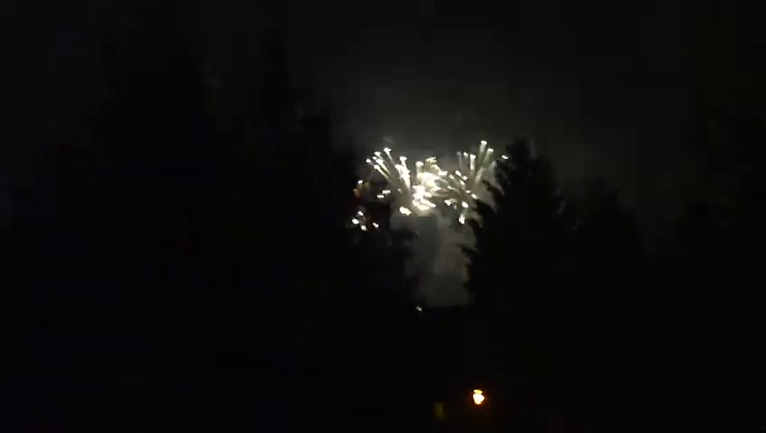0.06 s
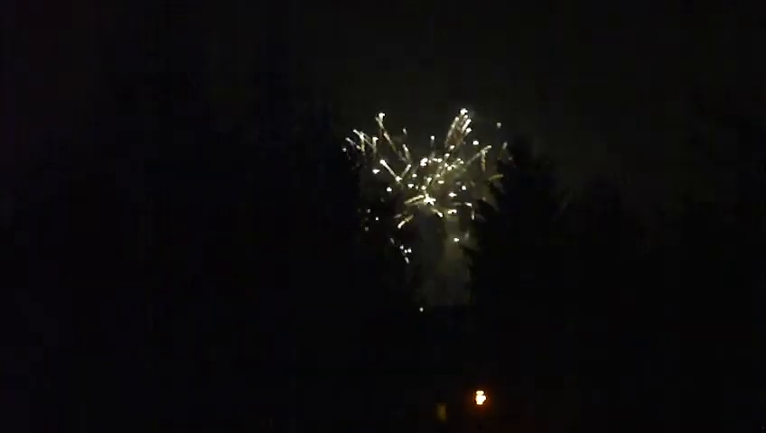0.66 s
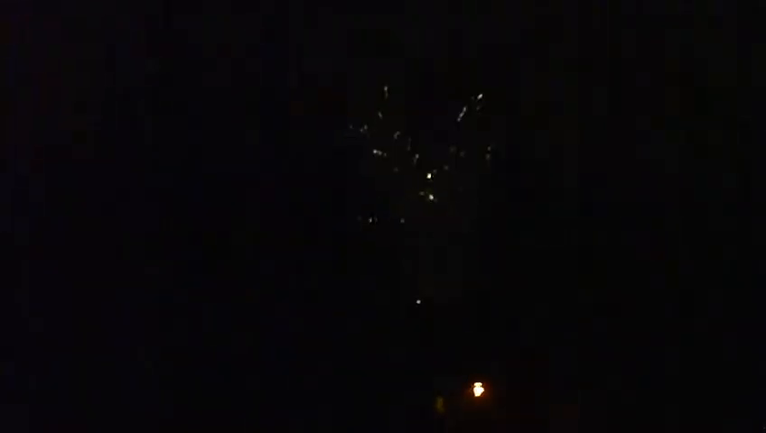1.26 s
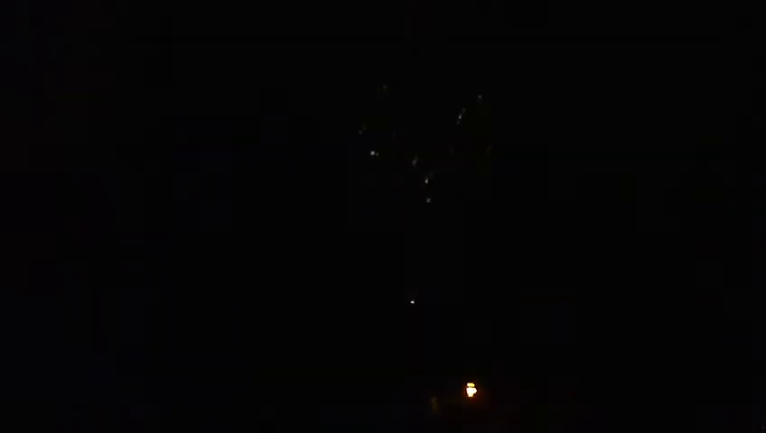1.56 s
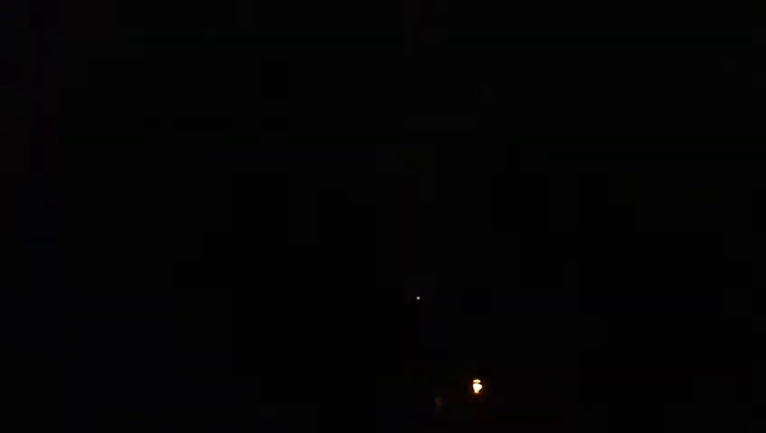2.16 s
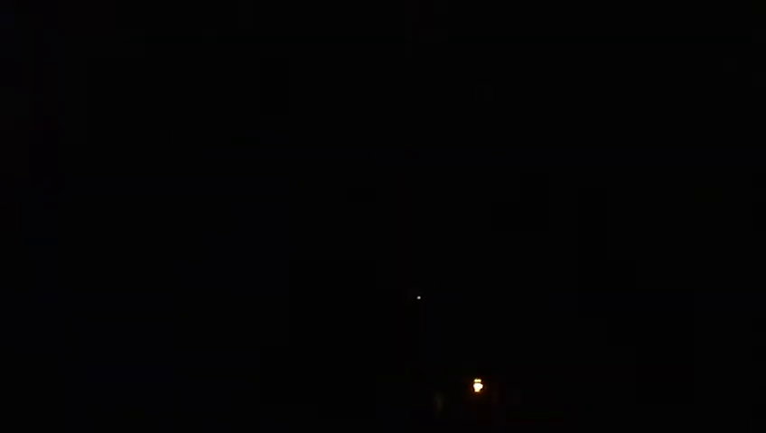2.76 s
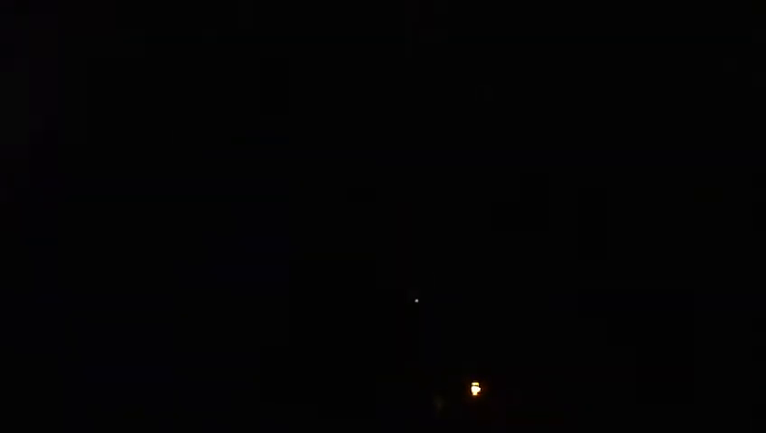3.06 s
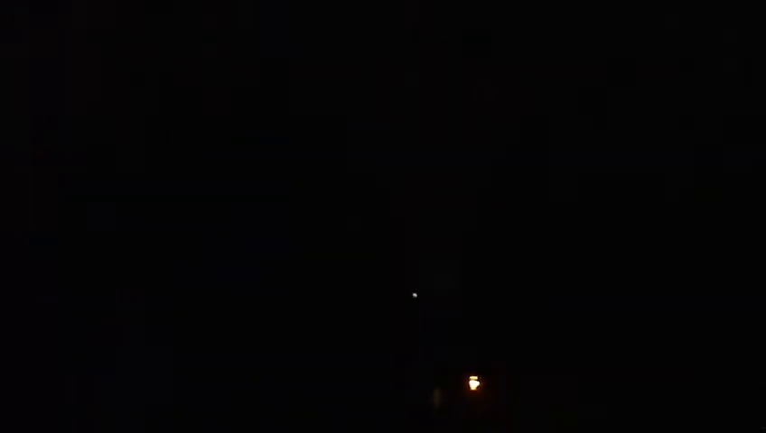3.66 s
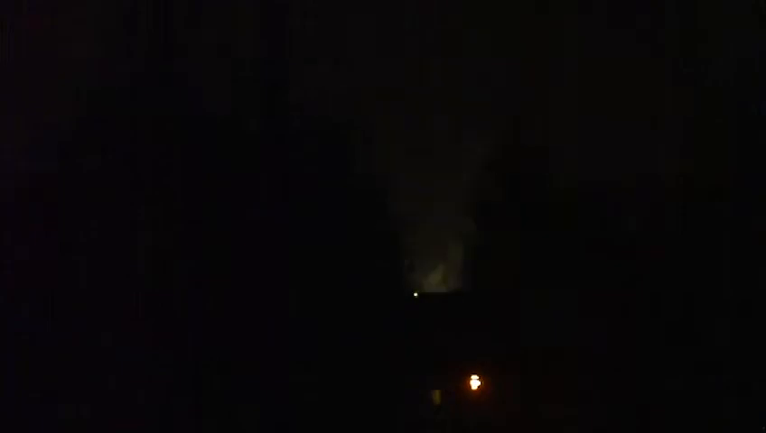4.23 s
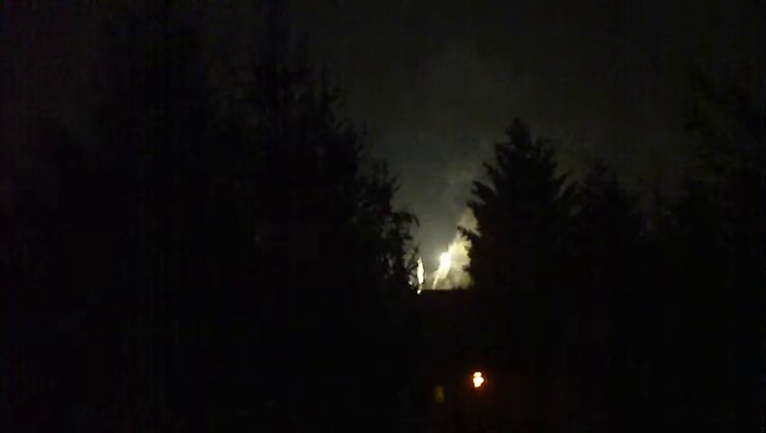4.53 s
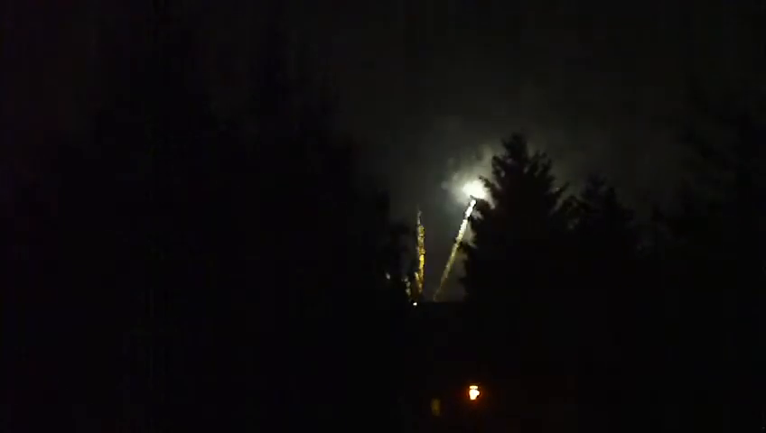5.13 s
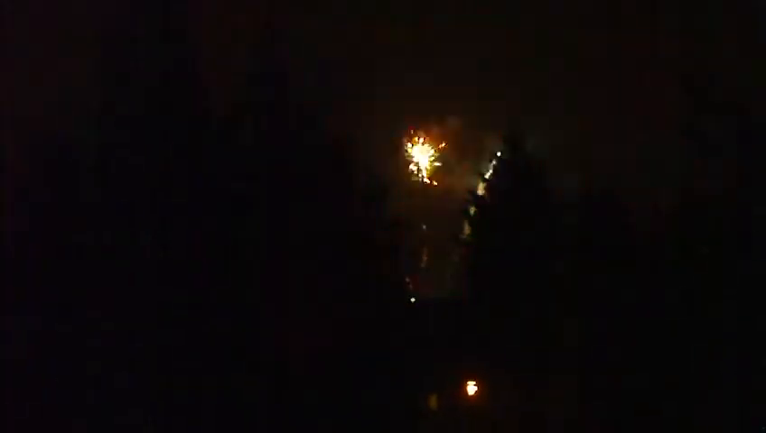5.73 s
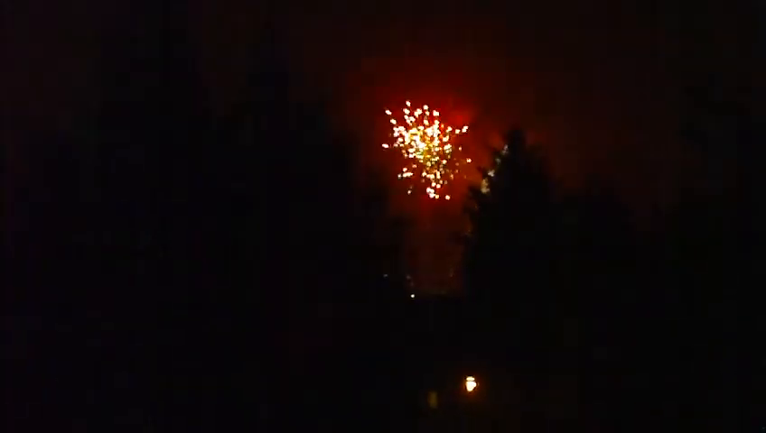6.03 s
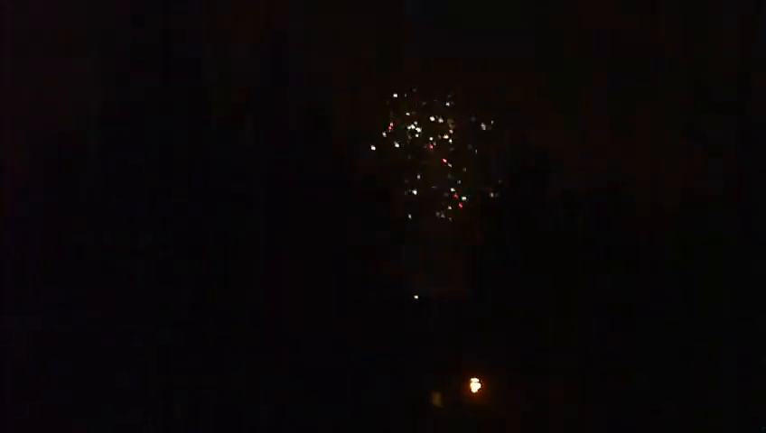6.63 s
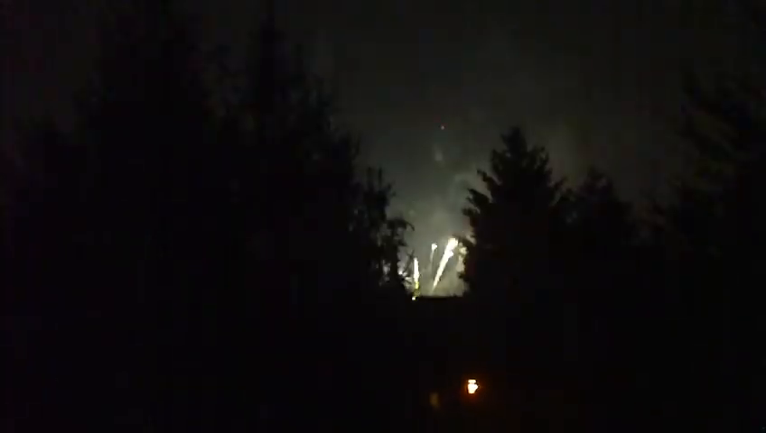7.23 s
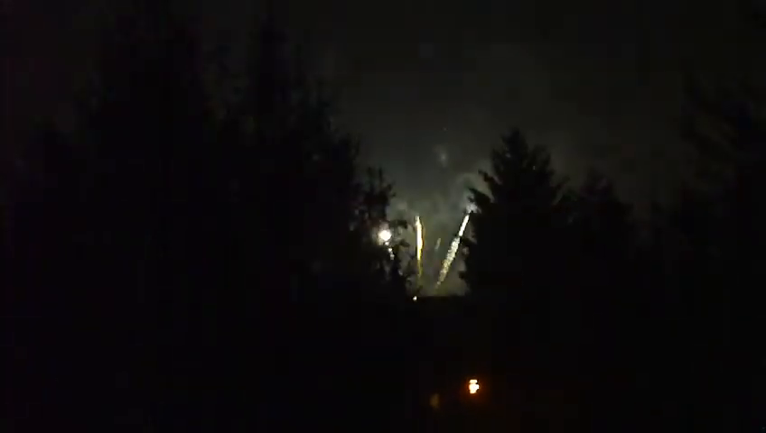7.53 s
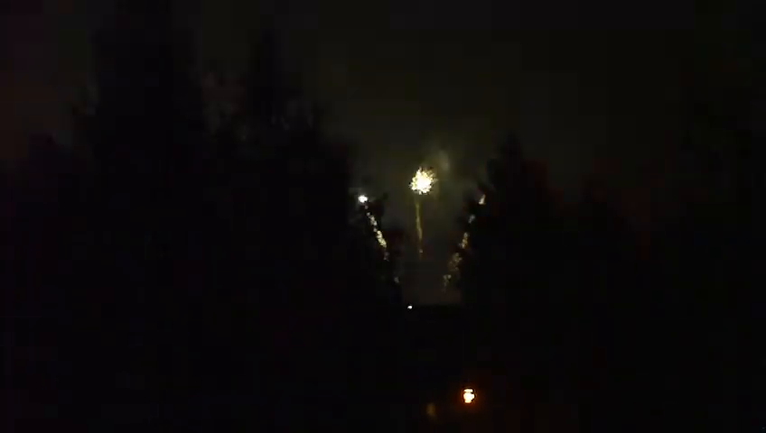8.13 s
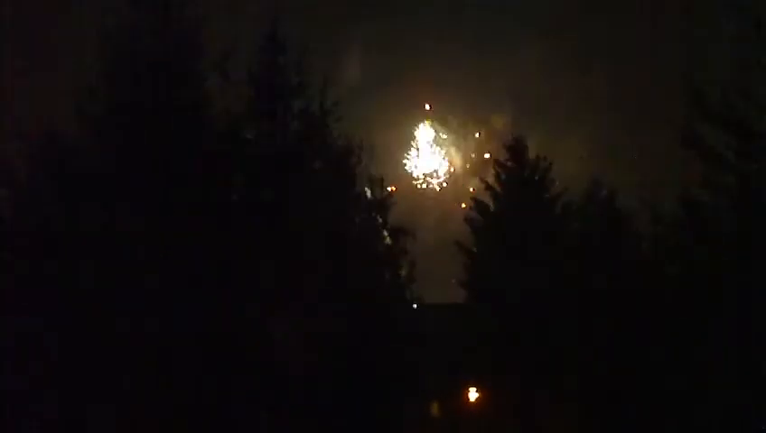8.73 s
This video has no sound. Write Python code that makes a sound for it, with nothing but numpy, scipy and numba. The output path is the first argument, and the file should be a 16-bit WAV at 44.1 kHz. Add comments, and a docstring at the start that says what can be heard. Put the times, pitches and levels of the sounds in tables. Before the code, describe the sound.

Fireworks go off in a dense, unbroken barrage outdoors among trees. Sharp bangs come many times a second, each with a short echo, over clouds of crackling stars and a dull roar of distant bursts. A few faint, high whistles fall in pitch during the first second. Past the middle a close firecracker snaps and launch tubes pop. The small microphone thuds and briefly ducks on the loudest bangs.

```python
"""Night fireworks among trees

Shells crack, each with a hard reflection and a tail scattered by the woods; launch tubes ring, close
stars snap and a firecracker goes off twice. Further salvos and clouds of crackling stars swell out of a
steady roar, and a few burning tubes whistle, falling in pitch. A small camera hears it all: on a loud
bang its microphone overloads with a low thud, the first cycles clip and gain control ducks the roar."""
import sys
import numpy as np
from scipy import signal
from scipy.fft import rfft, irfft
from scipy.io import wavfile
from scipy.ndimage import uniform_filter1d, minimum_filter1d
from numba import njit

SR = 44100
rng = np.random.default_rng(int(sys.argv[2]) if len(sys.argv) > 2 else 0)


def to_wav(s):
    """Save 16-bit WAV."""
    ch = np.atleast_2d(s).T  # columns
    pcm = np.round(np.clip(ch, -1, 1) * 32767)  # PCM
    wavfile.write(sys.argv[1], SR, pcm.astype(np.int16))


N = 396459

# far salvos that swell out of the roar: (peak time [s], half-length [s], level [dB])
FAR_SALVOS = [(.38, 0.066, -19), (.82, 0.065, -19.5), (.98, 0.059, -19.5), (1.36, 0.071, -19.5),
              (1.63, 0.12, -23.5), (1.91, 0.036, -14.5), (2.25, 0.03, -42), (2.56, 0.11, -22.5),
              (3.92, 0.049, -23.5), (4.2, 0.42, -29.5), (4.66, 0.086, -17.5), (5.32, 0.039, -23),
              (5.52, 0.052, -21.5), (5.85, 0.17, -24.5), (6.42, 0.042, -38), (6.62, 0.076, -22.5),
              (7.02, 0.064, -19), (7.24, 0.036, -17), (7.5, 0.13, -22.5), (7.97, 0.24, -25),
              (8.33, 0.043, -19), (8.6, 0.062, -19.5), (8.97, 0.03, -16)]
# clouds of crackling stars: (peak time [s], half-length [s], level [dB], sizzle [dB])
STAR_CLOUDS = [(0.456, 0.071, -30.5, 0), (0.783, 0.12, -35.5, 6), (1.035, 0.033, -29, 2),
               (1.31, 0.091, -25, -5.5), (1.616, 0.069, -27, 0), (1.734, 0.016, -22, -4),
               (1.844, 0.099, -23, -0.5), (2.068, 0.083, -27, -5.5), (2.253, 0.066, -32.5, -3),
               (2.618, 0.12, -30.5, -6), (3.144, 0.15, -32.5, -6), (4.04, 0.11, -37, -1),
               (4.352, 0.11, -34.5, -17), (4.537, 0.025, -25.5, -21), (4.739, 0.047, -25.5, -4.5),
               (5.383, 0.053, -44, -11), (5.644, 0.31, -31, -6), (5.947, 0.041, -28, -24),
               (6.088, 0.037, -28, -3.5), (6.183, 0.1, -37.5, 0), (6.4, 0.33, -38, -12),
               (7.096, 0.12, -31.5, -2), (7.322, 0.09, -31.5, -30), (7.998, 0.1, -29.5, -1.5),
               (8.315, 0.11, -31.5, -19), (8.52, 0.015, -23.5, -16), (9, 0.059, -29, -14)]
# tone colour of the crackle: (frequency [Hz], level [dB])
CRACKLE_SPECTRUM = [(30, -68), (150, -18), (400, 6), (800, 11.5), (1300, 9.5), (1900, 8.5), (2300, 2.5),
                    (3300, 0), (3900, -9), (5000, -17.5), (6300, -25), (7200, -51)]
ROAR_BED_DB, CRACKLE_BED_DB = -27.5, -43.5  # between the swells, before each layer's trim
BLAST_GAIN = np.sqrt(.003 * SR)  # gives a unit-energy pulse an rms of 1 over 3 ms


def shells(trunks_db=-12, trunks_dull_db=-7, woods_db=-17):
    """Each shell is a short blast and its hard reflection, scattered by branches, trunks and woods."""
    # the nearer bursts: (time [s], level [dB], body pitch [Hz], bark [dB], crack [dB],
    # microphone overload thud [dB], branch scatter [dB], reflection lag [ms], reflection [dB])
    bursts = [(0.0663, -9, 652, -9.5, -15.5, -5, 12, 6.1, -4),
              (0.123, 3.5, 656, -6.5, -7, -10, 7, 15.6, -4), (0.208, -8.5, 585, -2.5, -27, 8, 2, 9, 3),
              (0.3076, -11, 725, -4, -17, -3, -6, 8.5, -18), (0.3262, -4, 625, 0.5, 0, 14, 10, 7.8, 4.5),
              (0.3857, -3, 780, 11, 10.5, 6.5, -13, 16.8, -2), (0.5838, -3.5, 490, 4, 10, 22, 6.5, 8.9, 2),
              (0.727, -9, 695, 2, -17, -29, 3, 7.9, 5.5), (0.8385, -13, 770, 8, -18, 6, 7.5, 7.5, 7),
              (0.8649, -2, 537, 1, 5, 11, 2, 8.0, 0), (0.9355, -15.5, 650, -2, -11, -10, -2, 8.5, -8),
              (0.9691, -4, 580, 4.5, -3.5, 1, -7.5, 16, -6.5),
              (0.9837, -2.5, 620, -3.5, -9, -3, -1, 18, 0.5), (1.0152, -3, 570, -1.5, -0.5, 15, 2, 8, -3.5),
              (1.031, -3.5, 540, 7, -3, 8, -10, 7.3, 3), (1.0519, -1.5, 553, 10, 3.5, 2, -14, 7.8, -6),
              (1.2124, -13.5, 694, -2, -14, -15.5, 1, 6.1, -9),
              (1.2619, -6, 660, 0.5, -20, -19, 3, 19.6, -5), (1.3568, -10, 610, 5, -13, -3.5, -1, 8.5, 7),
              (1.3815, -7, 650, -12, -13, -13, -8, 8.5, -5), (1.3987, 0.5, 735, -18, -24, 7, -10, 7.1, -8),
              (1.4133, -1, 614, 5.5, 9.5, 25, 0, 12.4, -5), (1.4299, -3.5, 497, -3, 2, -3, 0, 8, -2),
              (1.5706, -11.5, 700, 1, -18, -8, 2, 8.5, -7), (1.6168, -13, 765, -0.5, 1, -20.5, 8, 3.3, 1),
              (1.6252, 0.5, 780, -6, -4, -24, -10, 7.8, -20),
              (1.6572, -5, 800, -2.5, -19, -15, -1, 7.9, 4.5), (1.7681, -8, 566, -2, -11, -7.5, 6, 9.5, -1),
              (1.8169, -7.5, 810, 13, -14, -14, 1, 9.6, -23), (1.8713, -14, 650, 4, 11, -16, 12.5, 9.3, 10),
              (2.064, -14, 616, -2, -16, -15, 3, 15, 2), (2.208, -19, 700, 5, -13, -9.5, 9, 8.1, 3),
              (2.2324, -11, 816, 4, -26, -8, 6, 9.3, -7.5), (2.2726, -17, 533, 5.5, -15, 5, 5, 8.1, -2),
              (2.4248, 2, 710, -4, -12, -10, 5.5, 16.2, -0.5), (2.5505, -11, 800, 3, -7, -2, 5, 5.9, -4),
              (2.5816, -10.5, 950, 10.5, 5, 0, 4, 7.3, -7), (2.6356, 3, 713, -4, -7.5, 6, 1.5, 8.9, -3.5),
              (2.758, -7.5, 603, -7, -8, -31, 7, 8.7, 2), (2.7927, -13, 765, -0.5, -20, -9, 1, 8.2, 6),
              (2.9199, -2.5, 570, -3, -0.5, -12, 8, 10.6, -2.5),
              (2.9714, -4, 604, -10, -11.5, -6, -1, 8.0, -9),
              (3.193, -6.5, 560, 4, -12.5, -5, 2.5, 9.2, -0.5),
              (3.2727, -16.5, 830, 0, -14, 10, 11, 14.4, 10), (3.4118, -13.5, 724, -4, -4, -4, 8, 8.5, -14),
              (3.5046, -13.5, 730, -5, -15.5, 1, -3, 6.7, 0.5), (3.574, 3, 614, 0.5, -7.5, 9, 3, 18, -7),
              (3.6403, -2, 605, -0.5, -12.5, 5, 0, 7.3, -3), (3.7099, -8.5, 580, 2, -3.5, 6, 0, 5.9, 2),
              (3.7545, -13, 650, 4.5, -31, -7, 4.5, 8.9, 6.5),
              (3.852, -6, 825, -5.5, -8.5, -10, 9, 7.8, 4.5),
              (3.911, 1, 593, -4.5, -1.5, -9, 2, 14.4, -8.0), (4.3173, -5, 614, 1, -2.5, -13, -1.5, 9, 6),
              (4.3955, -10, 740, 1.5, -13, -8, 8, 12, -0.5), (4.437, 0.5, 825, 4, -4.5, 1, 0, 9.8, 3.5),
              (4.5083, -13.5, 760, 6.5, -10, 18, 5, 9.8, 6), (4.545, -15.5, 700, 9, -14, -10, 4, 7.1, -4),
              (4.5766, -3, 775, 4.5, 3, -14, 10.5, 8.7, 1), (4.6193, -5, 600, 7, -15, -3, -10, 9.8, -7),
              (4.7192, -6.5, 820, 12, 0.5, -18, 4.5, 17.3, -5.5),
              (4.978, -8.5, 650, -1.5, -9, -20, 10.5, 5.5, 2.5),
              (4.994, 2, 680, -1, -6.5, 0, -3, 16.7, -11), (5.0292, 1.5, 580, -1, -11, -16, -9, 16, -20),
              (5.2898, -11, 644, -1.5, -18, -3, 8, 4.7, -5), (5.3239, -9, 660, -2, -17, -14, 12, 21, -1),
              (5.3742, -10, 860, 2, -15, -17, 3, 12, 0), (5.401, -9.5, 710, 13, -27, -7, 0, 17.6, -5),
              (5.7713, 0, 663, 8, -0.5, -3, -3, 17, -2), (5.834, -3, 640, -4.5, -15, -11, 5, 7.8, 3.5),
              (5.888, -0.5, 1080, 4, -12, 7, -9, 7, -13), (6.0398, -8, 660, -7, -30, 2, 6, 16, -7),
              (6.069, -14.5, 720, -10, -7, 13, 5, 8.7, 4), (6.2037, -16.5, 840, -7, -36, -15, 4, 8.6, -0.5),
              (6.2905, -16.5, 620, 12, -23, 4, 2, 11, 5), (6.4233, -11.5, 790, -12, -31, -26, -8, 17, -19),
              (6.535, -4, 684, 2.5, -7.5, -2, 1, 16.5, 4),
              (6.6603, -4.5, 790, -3.5, -14, -17.5, -2, 6.8, -14),
              (6.7118, -1, 470, 0, 2.5, 11, 3.5, 8, -0.5), (6.774, -3, 477, -4, -7, 13, 0, 8.4, -12),
              (6.811, -7, 460, 0, -8, 5, -7, 7.8, -5), (6.871, -15, 460, -12, -2, 9, -1, 9.3, -17.5),
              (6.9826, -5, 636, -5.5, -0.5, 12, 11.5, 7.7, 2.5),
              (7.0419, -17, 640, -6, -17.5, -7, -11.5, 8.5, -2),
              (7.1119, -14.5, 616, 3, -6.5, -2, 5.5, 8.3, -4.5),
              (7.1321, -9, 594, -2.5, -17, -35, 9, 10.7, 3.5),
              (7.1549, -2.5, 573, -1.5, -15, -26, -5, 8.6, -5),
              (7.216, -15, 553, 3.5, -16, -7, 4, 13.6, -10), (7.3956, -9, 675, 0, -9.5, -18.5, 6, 8.3, 5),
              (7.4777, -9, 696, 0, -18, -12, -3, 8.5, -4), (7.499, -2, 706, -4.5, -7, -23, 11, 7.7, 2.5),
              (7.526, -0.5, 666, 4.5, -5, -2.5, -9, 7.8, -0.5),
              (7.6316, -13, 615, 5.5, -7, 16, 6.5, 8.3, 7),
              (7.6494, -9.5, 704, 6.5, -9.5, -6, -0.5, 8.4, 2), (7.7803, 1, 695, -2.5, -5, -28, 1, 15, -1),
              (7.8286, -1, 546, -1.5, 0.5, 20, -2, 9.6, -8.5),
              (7.9188, -9, 650, -2, -14, -16.5, -2, 8.5, -7),
              (7.9954, -10.5, 760, 7, -8, -18, 5.5, 7.4, -1),
              (8.0535, -18.5, 750, 16, -16, -8, 1.5, 8.5, -4),
              (8.1008, 0, 540, -4.5, -16, -36, -2, 8.7, -1),
              (8.2284, -15, 730, 2.5, -25, -4, 10.5, 6.6, -4.5),
              (8.2802, -2, 870, 12.5, -5, -10, 1, 17.3, -1),
              (8.3993, -12, 553, -1.5, -17, -15, 16, 11.3, 4),
              (8.4925, -12.5, 810, 14, -9, -11, 2, 17.4, -5), (8.519, -5, 634, 5, -11, -28, 4.5, 8, 7),
              (8.602, -6.5, 710, 12.5, 7, 18, 5.5, 18, -1.5),
              (8.7807, -15, 734, -8, -10, -7, -6, 7.2, -13.5),
              (8.8357, -9.5, 576, 4.5, 5, -4, 4.5, 17.8, -3.5),
              (8.941, -3.5, 637, 6.5, -4, 12, -7, 14.6, 0)]
    out = np.zeros(N)
    for s, db, body_hz, bark_db, crack_db, mic_thud_db, branch_db, lag_ms, echo_db in bursts:
        gain = undb(db) * BLAST_GAIN
        direct = gain * blast(body_hz, bark_db, crack_db, mic_thud_db)
        add(out, s, direct)
        reflection = gain * blast(body_hz, bark_db, crack_db - 3, mic_thud_db - 4)  # duller and thinner
        add(out, s + lag_ms / 1000, undb(echo_db) * reflection)
        # branches scatter the upper mids; the top of the crack stays dry
        upper_mids = filtered(direct, [900, 2800], "band")
        add(out, s, undb(branch_db) * signal.fftconvolve(upper_mids, scatter(.078, .00049)))
        off_trunks = gain * blast(body_hz, trunks_dull_db, 2 * trunks_dull_db, mic_thud_db)
        add(out, s, undb(trunks_db) * signal.fftconvolve(off_trunks, scatter(.35, .004)))
    # the long way through the woods takes the treble out
    return out + undb(woods_db) * through(filtered(out, 1300), scatter(t60=.84, build_s=.012))


def blast(body_hz, bark_db, crack_db, mic_thud_db):
    """A dry report (body, upper-mid bark, treble crack) with the low thud of the mic overloading."""
    # tone colour of a shell's blast: (frequency [Hz], level [dB])
    blast_spectrum = [(30, -47), (100, -43), (170, -26.5), (260, -10), (380, -2.5), (500, 4.5), (620, 7.5),
                      (760, 2), (1200, -10), (1850, -8.5), (2400, -18), (3300, -17.5), (4600, -25.5),
                      (6200, -32.5), (7400, -59.5)]
    hz, db = np.transpose(blast_spectrum)
    db = db + np.interp(hz, [100, 260, 750, 1200, 2000, 3000],
                        [mic_thud_db, 0, 0, bark_db, bark_db, crack_db])
    hz = hz * (body_hz / 650) ** np.clip(2 - hz / 1000, 0, 1)  # retune the body, leave the treble
    report = pulse(np.column_stack([hz, db]), ripple_db=2.5)
    for ring_hz, width_hz in (body_hz, 1400), (2800, 1300), (4300, 900):
        report = ring(report, ring_hz, width_hz)
    return report


def close_stars(lag_s=.016, echo_db=-9):
    """A near star splits with a thin, dry snap; a weaker reflection follows."""
    # single stars close by: (time [s], level [dB], bark pitch [Hz], treble [dB])
    splits = [(0.0653, -27, 2580, 15), (1.591, -18, 1600, -5), (1.744, -23, 1700, -9),
              (1.9068, -25, 1700, -9), (2.0793, -16, 1710, -15), (2.212, -24, 2300, -11),
              (2.268, -23, 2410, 1), (2.413, -18.5, 2280, 1), (2.5387, -20, 2900, 1),
              (3.192, -22.5, 2520, -1), (4.52, -24, 2500, -10), (5.3223, -20, 2200, -12),
              (5.7097, -32, 1700, -15), (5.778, -8, 2400, -10), (5.9378, -23, 1600, -14),
              (5.985, -25, 2000, -12), (6.077, -14.5, 2400, 2), (6.9556, -18, 1800, -9),
              (7.1017, -17, 2900, -11), (7.4696, -20, 1520, -25), (7.913, -24, 1700, -12),
              (8.3306, -14, 1700, -22), (8.506, -27, 2700, 1)]
    out = np.zeros(N)
    for s, db, bark_hz, treble_db in splits:
        spectrum = [(150, -45), (700, -14), (bark_hz, 0),
                    (4000, treble_db - 11), (6200, treble_db - 22), (7400, -48)]
        snap = ring(pulse(spectrum, ripple_db=4), bark_hz, width_hz=1600)
        snap = snap + .5 * through(snap, scatter(t60=.027, build_s=.0005))
        snap = undb(db) * BLAST_GAIN * snap / np.linalg.norm(snap)
        add(out, s, snap)
        add(out, s + lag_s, undb(echo_db) * snap)
    return out


def firecracker():
    """A close firecracker: a thin, dry report under a few milliseconds of tearing treble."""
    # two quick reports: (time [s], level [dB], tear decay [s], body pitch [Hz], body [dB])
    reports = [(5.4546, 4, .017, 1200, -9), (5.4627, 1, .006, 950, 0)]
    out = np.zeros(N)
    for s, db, t60, body_hz, body_db in reports:
        gain = undb(db) * BLAST_GAIN
        tear = filtered(scatter(t60, build_s=.0009), [1100, 2800], "band")
        add(out, s, gain * tear / np.linalg.norm(tear))
        add(out, s, gain * undb(body_db) * blast(body_hz, bark_db=7, crack_db=0, mic_thud_db=-15))
    return out


def mortars(t60=.15, rise_s=.003):
    """The air column of a launch tube rings briefly after the lifting charge."""
    # tubes firing: (time [s], pitch [Hz], level [dB])
    launches = [(3.405, 218, -25), (4.589, 237, -11.5), (6.714, 383, -15), (6.776, 380, -14),
                (6.815, 394, -21), (6.869, 370, -21)]
    out, t = np.zeros(N), np.arange(SR // 2) / SR
    for s, hz, db in launches:
        add(out, s, undb(db) * np.sin(2 * np.pi * hz * t) * rise_and_decay(t, rise_s, t60))
    return out


def whistles(waver=.0078, sputter_db=1.5, rasp_db=-3, smear_db=-9):
    """Burning tubes swell and fade, falling in pitch; uneven burning roughens them, echoes smear them."""
    # falling whistles: (peak time [s], half-length [s], pitch at peak [Hz], fall [Hz/s], level [dB])
    glides = [(0.068, 0.038, 4920, 920, -27), (0.146, 0.1, 5150, 397, -40),
              (0.304, 0.032, 4580, 299, -28.5), (0.443, 0.076, 4710, 1290, -32.5),
              (0.56, 0.025, 4080, 2370, -24.5), (0.72, 0.046, 4210, 1110, -34),
              (0.81, 0.047, 3950, 2350, -33.5), (.94, .03, 3920, 500, -41)]
    out, size = np.zeros(N), int(1.4 * SR)
    for peak_s, half_s, peak_hz, fall_hz_per_s, db in glides:
        t = np.arange(size) / SR - peak_s
        hz = (peak_hz - fall_hz_per_s * t) * (1 + waver * wander(200, size))
        phase = 2 * np.pi * np.cumsum(hz) / SR
        rasp = wander(500, size) * np.cos(phase) + wander(500, size) * np.sin(phase)
        envelope = undb(db + sputter_db * wander(60, size)) * np.exp(-.5 * (t / half_s) ** 2)
        tone = envelope * (np.sin(phase) + undb(rasp_db) * rasp)
        add(out, 0, tone + undb(smear_db) * through(tone, scatter(t60=.14, build_s=.005)))
    return out


def far_reports(db=-32, lag_s=.0074, salvo_share=.33):
    """Smaller bursts further off: dull double knocks that stand out of the roar and grow with a salvo."""
    knocks = through(pops(60, spread_db=1.3), blast(750, bark_db=0, crack_db=-10, mic_thud_db=-14))
    swell_db = salvo_share * (swells(FAR_SALVOS, ROAR_BED_DB) - ROAR_BED_DB)
    return undb(db + swell_db) * unit(knocks + np.roll(knocks, int(lag_s * SR)))


def star_snaps(trim_db=-1, lag_s=.007, echo_db=-5):
    """Crackling stars near enough to be heard one by one: each a gritty pop with its reflection."""
    power = tails(pops(45, spread_db=1.8) ** 2, fade_s=.0054)
    power = power + undb(echo_db) ** 2 * np.roll(power, int(lag_s * SR))
    grit = through(rng.standard_normal(N), pulse(CRACKLE_SPECTRUM))
    return undb(swells(STAR_CLOUDS, CRACKLE_BED_DB) + trim_db) * unit(np.sqrt(power) * grit)


def sizzle(trim_db=-8):
    """The nearer clouds keep their top: a fine spitting above the crackle."""
    # tone colour of the spitting: (frequency [Hz], level [dB])
    sizzle_spectrum = [(1200, -33.5), (2600, -11.5), (3400, 4.5), (4600, -0.5), (6400, -16.5),
                       (7200, -35.5)]
    cloud_tops = [(s, half_s, db + sizzle_db) for s, half_s, db, sizzle_db in STAR_CLOUDS]
    spitting = unit(through(pops(4000, spread_db=2), pulse(sizzle_spectrum)))
    return undb(swells(cloud_tops, bed_db=-60) + trim_db) * spitting


def far_crackle(trim_db=7.5, flurries_per_s=55):
    """Clusters of burning stars go off at once over a steady fine crackle, partly blurred by distance."""
    sparks = pops(1300, spread_db=2.8)
    starts = rng.random(N) < flurries_per_s / SR
    flurries = np.sqrt(tails(starts, fade_s=.005) + .11)
    crackle = through(sparks * flurries, pulse(CRACKLE_SPECTRUM))
    crackle = unit(crackle + .5 * through(crackle, scatter(t60=.042, build_s=.0032)))
    return crackle * undb(swells(STAR_CLOUDS, CRACKLE_BED_DB) + trim_db)


def far_roar(trim_db=3.5, blur_db=-3, flutter_db=1.48):
    """Dull far bursts, partly blurred by distance, merge into a roar that swells with each salvo."""
    # tone colour of the far bursts: (frequency [Hz], level [dB])
    roar_spectrum = [(25, -75), (70, -52.5), (150, -25.5), (230, -16), (340, -8), (540, 1), (720, 0),
                     (930, 1.5), (1200, -6), (1900, -11), (2400, -18.5), (4000, -37), (7000, -82)]
    roar = through(pops(900, spread_db=2.8), pulse(roar_spectrum))
    roar = unit(roar + undb(blur_db) * through(roar, scatter(t60=.46, build_s=.00056)))
    return roar * undb(swells(FAR_SALVOS, ROAR_BED_DB) + trim_db + flutter_db * wander(30))


def swells(table, bed_db):
    """Level in dB of a steady bed plus bell-shaped swells, whose powers add."""
    t = np.arange(N) / SR
    power = sum(undb(db) ** 2 * np.exp(-((t - s) / half_s) ** 2) for s, half_s, db, *_ in table)
    return 10 * np.log10(power + undb(bed_db) ** 2)


def pops(per_s, spread_db):
    """Randomly timed spikes: mostly small, a few large."""
    fires = rng.random(N) < per_s / SR
    spikes = fires * undb(spread_db * np.minimum(rng.exponential(size=N), 5))
    return unit(spikes - spikes.mean())


def pulse(spectrum, ripple_db=0, size=2048):
    """A causal pressure pulse of unit energy; the ripple is the colour of its own path."""
    bins_hz = np.maximum(np.arange(size // 2 + 1) * SR / size, 1)
    hz, db = np.transpose(spectrum)
    ripple = np.interp(bins_hz, np.geomspace(100, 8000, 32), rng.standard_normal(32))
    db = np.interp(np.log(bins_hz), np.log(hz), db) + ripple_db * ripple
    # minimum phase packs the energy into the attack
    cepstrum = irfft(db * np.log(10) / 20)
    cepstrum[1:size // 2] *= 2
    cepstrum[size // 2 + 1:] = 0
    pressure = irfft(np.exp(rfft(cepstrum)))
    return pressure / np.linalg.norm(pressure)


def ring(x, hz, width_hz):
    """All-pass resonance: holds back one band, so that a spike becomes a few cycles."""
    radius = np.exp(-np.pi * width_hz / SR)
    poles = [1, -2 * radius * np.cos(2 * np.pi * hz / SR), radius * radius]
    return signal.lfilter(poles[::-1], poles, x)


def scatter(t60, build_s):
    """Countless small echoes of unit total energy that build up and die away."""
    t = np.arange(int(t60 * SR)) / SR
    echoes = rng.standard_normal(len(t)) * rise_and_decay(t, build_s, t60)
    return echoes / np.linalg.norm(echoes)


def rise_and_decay(t, rise_s, t60):
    """An envelope with a soft attack and a decay of 60 dB in t60 seconds."""
    return np.exp(-np.log(1000) * t / t60) * (1 - np.exp(-t / rise_s))


def tails(spikes, fade_s):
    """Gives each spike an exponential tail."""
    return signal.lfilter([1], [1, -np.exp(-1 / (fade_s * SR))], spikes)


def wander(per_s, size=N):
    """Smooth random drift with a spread near 1."""
    step = int(SR / per_s)
    stairs = np.repeat(rng.standard_normal(size // step + 1), step)
    return unit(uniform_filter1d(stairs, step)[:size])


def filtered(x, hz, kind="low"):
    """A gentle low-pass or band-pass."""
    return signal.sosfilt(signal.butter(2, hz, kind, fs=SR, output="sos"), x)


def through(x, response):
    """Plays x through an impulse response, keeping its length."""
    return signal.fftconvolve(x, response)[:len(x)]


def add(out, s, x):
    """Mixes x into out at s seconds."""
    start = int(np.clip(s * SR, 0, N))
    out[start:start + len(x)] += x[:N - start]


def undb(db):
    """Decibels to amplitude."""
    return 10 ** (np.asarray(db) / 20)


def unit(x):
    """Scales x to an rms of 1."""
    return x / np.sqrt(np.mean(x ** 2))


def scene():
    """Near shells, stars, mortars and whistles over the far barrage, in mono."""
    near = shells() + close_stars() + firecracker() + mortars() + whistles()
    far = far_reports() + star_snaps() + sizzle() + far_crackle() + far_roar()
    return (near + far)[None]


@njit
def follow(x, attack, release):
    """Level detector that rises fast and falls slowly."""
    out, level = np.empty(len(x)), 0.
    for i in range(len(x)):
        level += (x[i] - level) * (attack if x[i] > level else release)
        out[i] = level
    return out


def gain_control(x, knee_db=-7.5, ceiling_db=2, attack_s=.00059, hold_s=.0075, release_s=.095):
    """Ducks the sound when it passes the knee, holds it down briefly, then lets it swell back."""
    rectified = np.minimum(np.abs(x), undb(ceiling_db))  # the detector saturates
    level = follow(rectified, 1 / (attack_s * SR), 1 / (release_s * SR))
    gain = 1 / np.maximum(level / undb(knee_db), 1)
    half_hold = int(hold_s * SR / 2)
    held = minimum_filter1d(gain, 2 * half_hold + 1, origin=half_hold)
    return x * uniform_filter1d(held, int(.0012 * SR) + 1)  # eased over 1.2 ms


def record(dry, band_hz=7500, soft_hz=12500, top_hz=16000):
    """Narrow-band sound, its treble cut off above 7.5 kHz; what gain control is too slow for clips."""
    narrow = signal.ellip(6, .3, 60, band_hz, fs=SR, output="sos")
    ducked = gain_control(signal.sosfilt(narrow, dry[0]))
    overloaded = signal.sosfilt(narrow, np.clip(ducked, -1, 1))
    softened = filtered(np.clip(overloaded, -1, 1), soft_hz)  # the overshoot clips at full scale
    top_cut = signal.ellip(8, .2, 70, top_hz, fs=SR, output="sos")
    return signal.sosfilt(top_cut, softened)[None]


dry = scene()
out = record(dry)
to_wav(out)
```